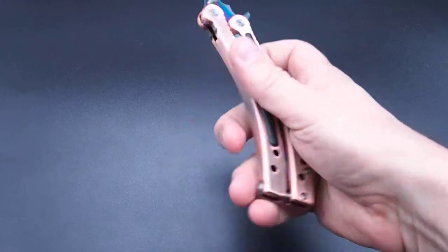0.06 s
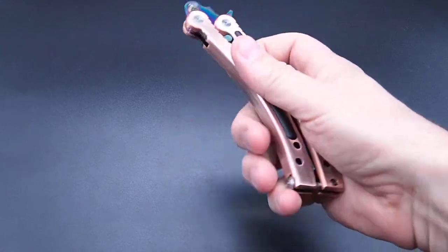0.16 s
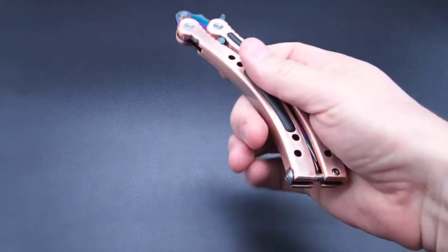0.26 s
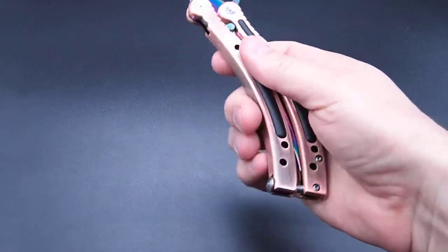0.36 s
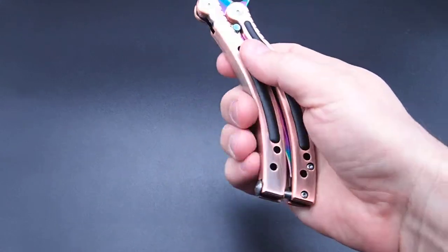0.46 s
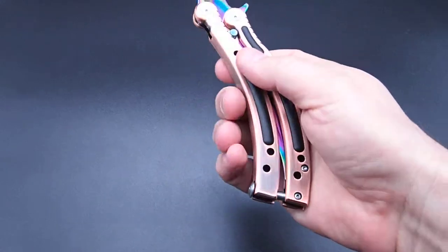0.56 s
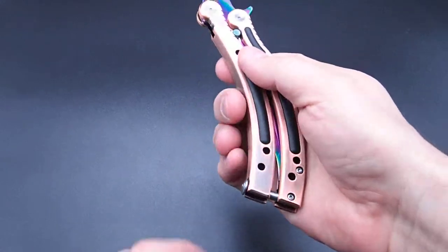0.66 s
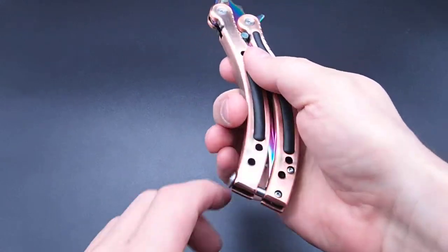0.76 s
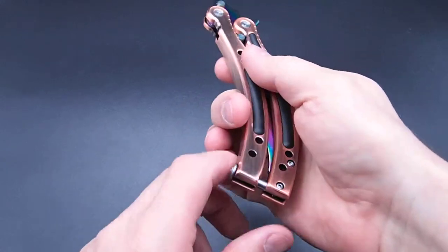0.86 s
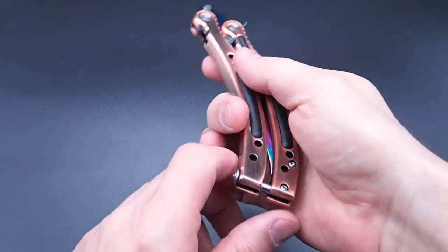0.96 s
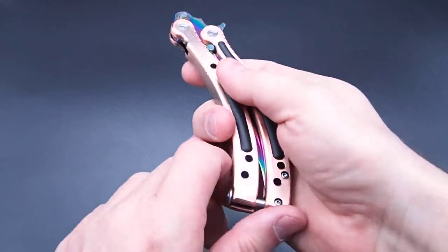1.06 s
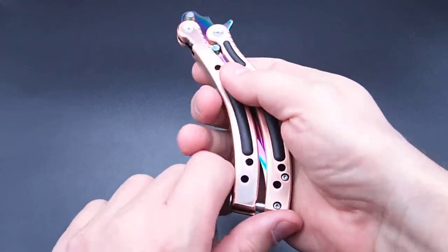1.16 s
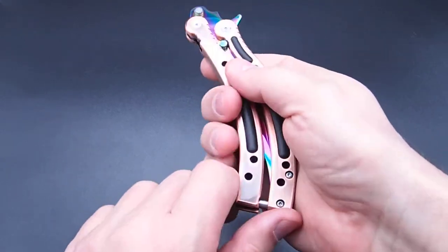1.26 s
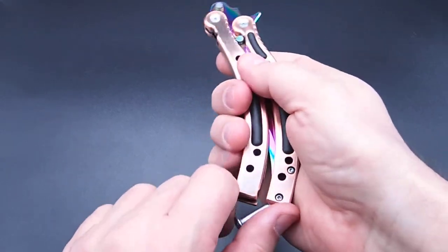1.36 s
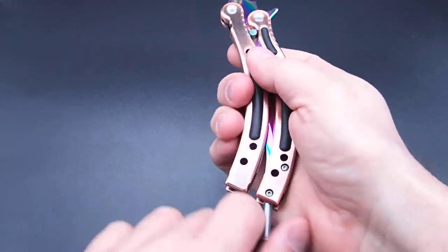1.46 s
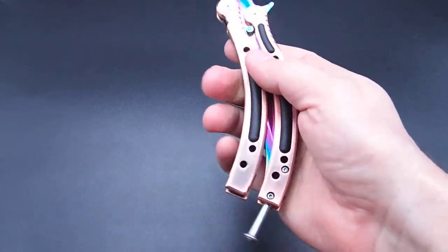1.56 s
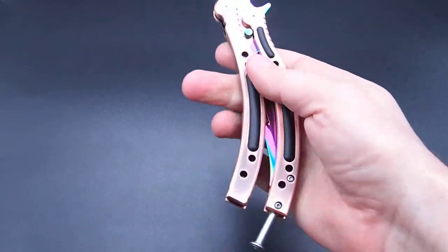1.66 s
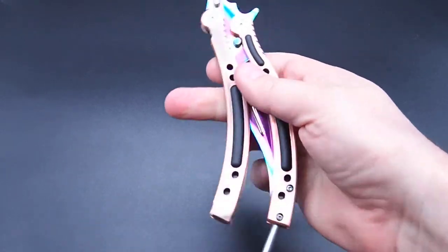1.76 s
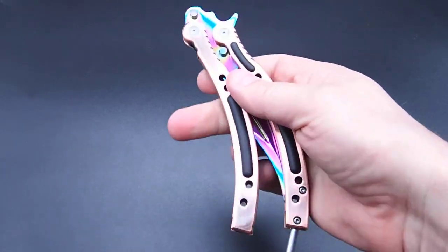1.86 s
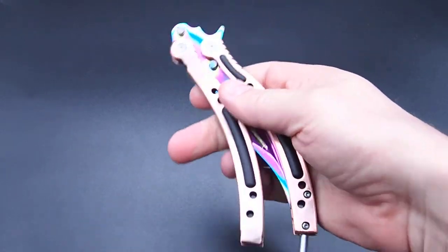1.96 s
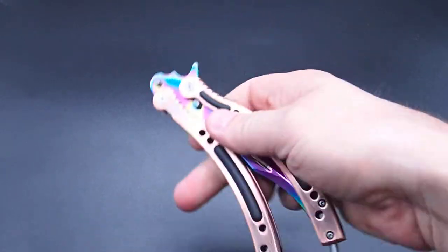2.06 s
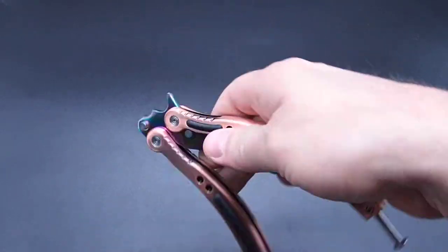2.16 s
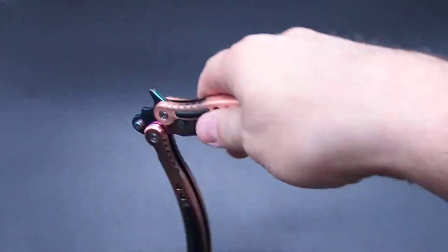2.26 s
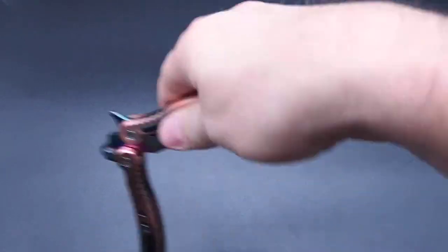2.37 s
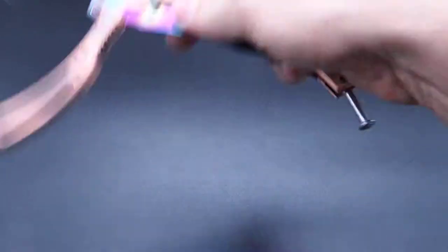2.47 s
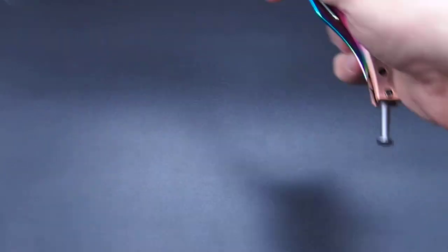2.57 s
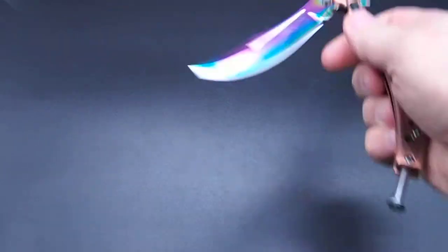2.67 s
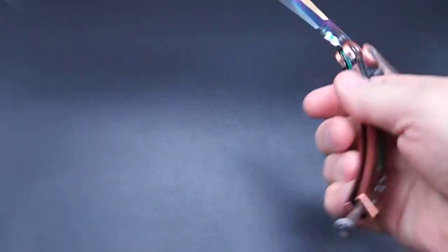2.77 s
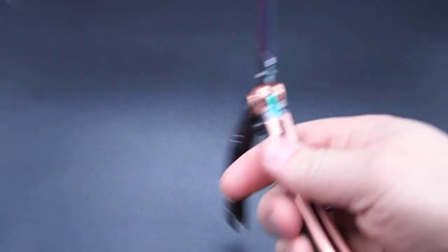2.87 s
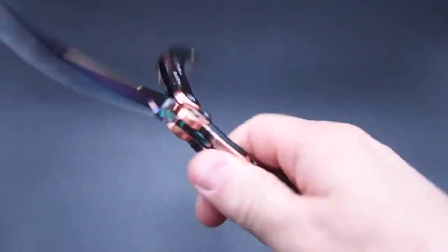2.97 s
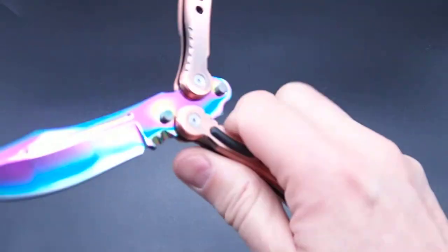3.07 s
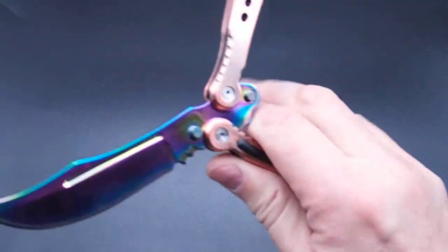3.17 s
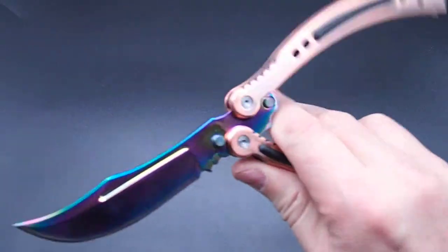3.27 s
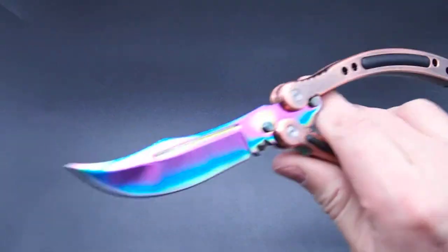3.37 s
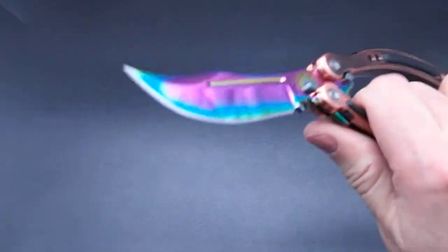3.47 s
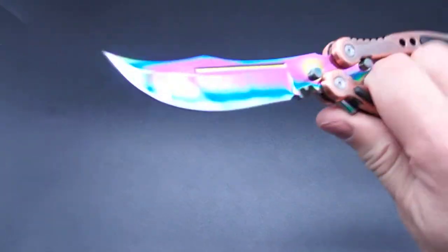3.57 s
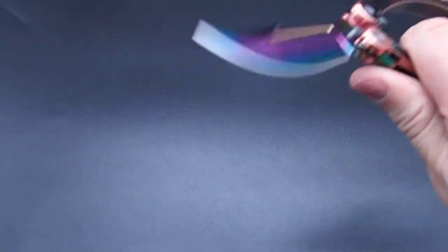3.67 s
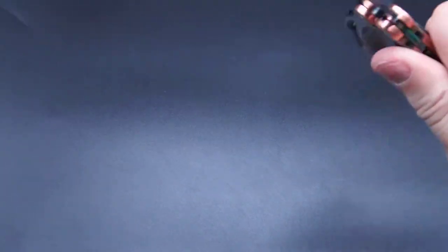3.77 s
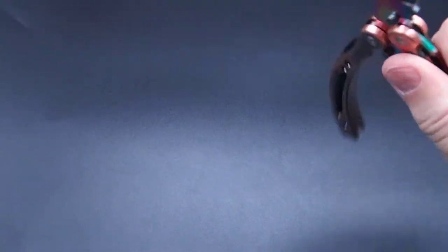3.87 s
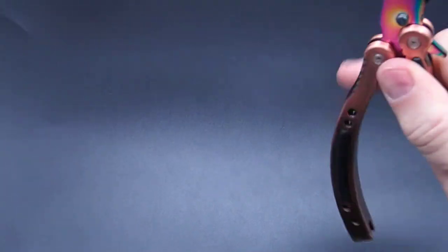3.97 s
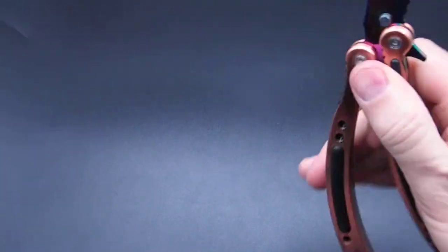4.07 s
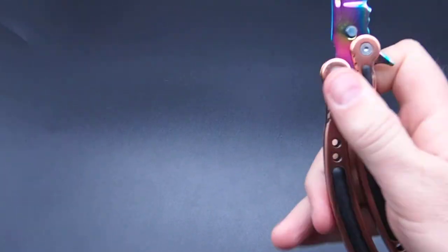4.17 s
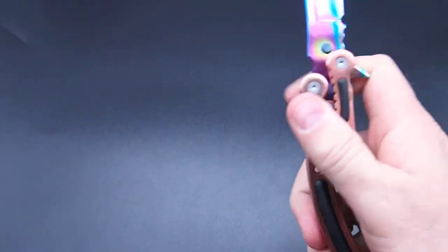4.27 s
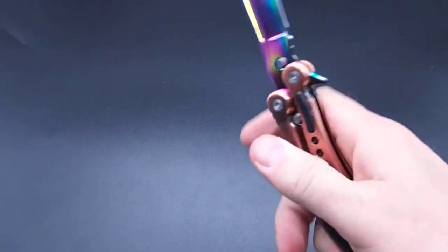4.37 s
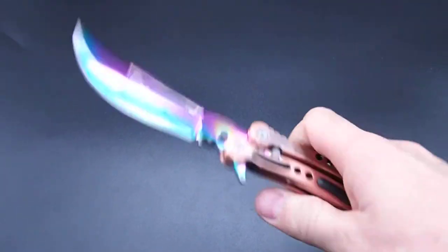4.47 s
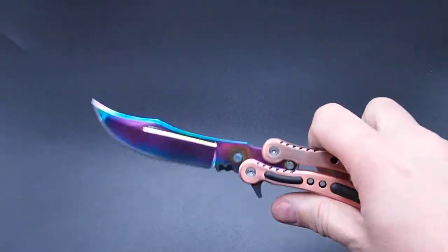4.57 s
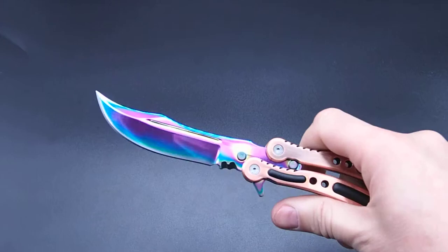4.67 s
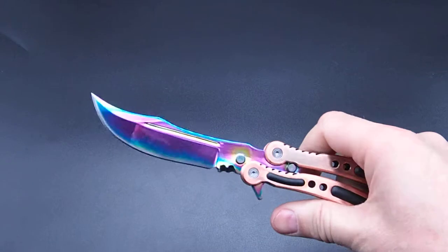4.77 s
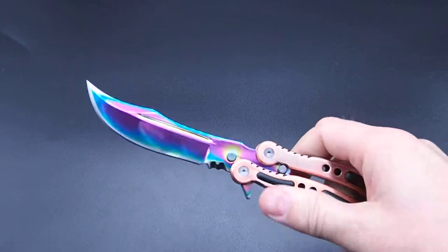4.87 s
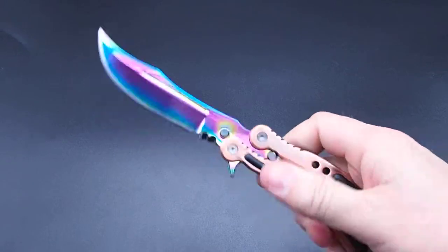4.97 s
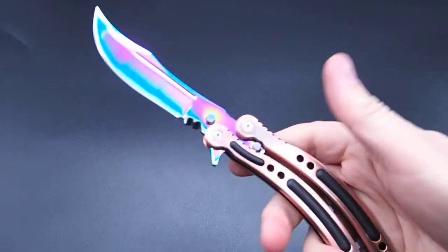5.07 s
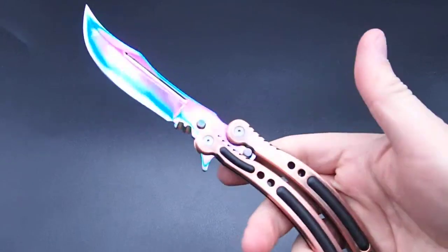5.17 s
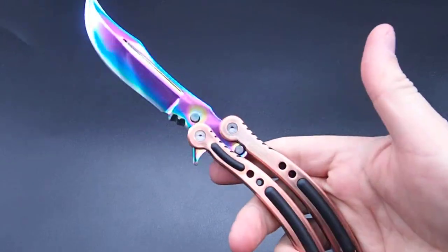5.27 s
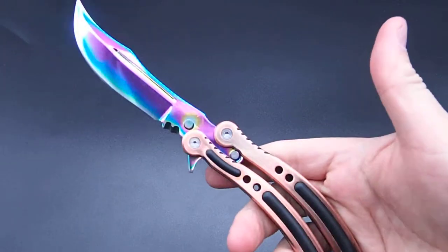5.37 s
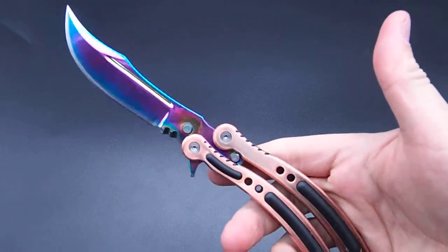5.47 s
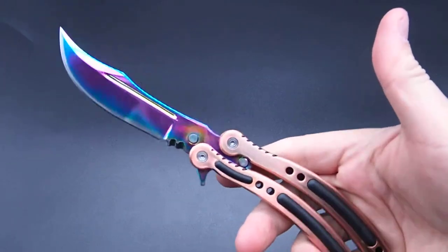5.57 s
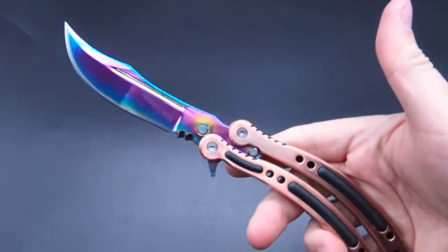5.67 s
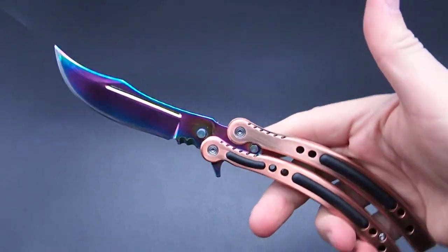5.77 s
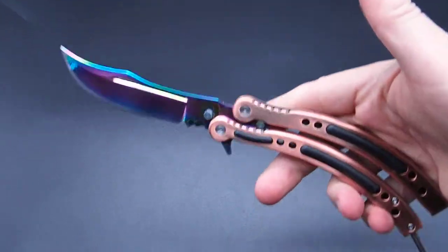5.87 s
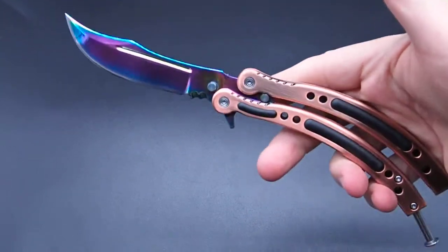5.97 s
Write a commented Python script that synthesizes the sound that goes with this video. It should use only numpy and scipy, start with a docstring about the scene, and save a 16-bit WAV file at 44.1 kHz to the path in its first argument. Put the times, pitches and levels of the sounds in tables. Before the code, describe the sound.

Close to the microphone in a small dry room, a metal butterfly knife is flipped open. After a quiet rustle of skin on steel come a latch click and small ticks, then a thump with a short scrape as a handle hits the desk. Several crisp, unevenly spaced metallic clacks follow, thinning out into gentle rubbing. A low hiss and a faint, intermittent high whine lie underneath.

```python
"""A steel butterfly knife is unlatched and flipped close to a microphone, above a desk in a small dry room.
Each impact of latch, handles and blade excites modes of the steel, which the hand damps.
Once a handle knocks on the desk, setting the top vibrating, and skids over it.
Friction of skin and pivots makes a soft rubbing between the clacks, over room hiss and a faint whine."""
import sys
import numpy as np
from scipy.fft import rfft, irfft, next_fast_len
from scipy.io import wavfile
from scipy.ndimage import uniform_filter1d, minimum_filter1d, map_coordinates

SR = 44100
rng = np.random.default_rng(int(sys.argv[2]) if len(sys.argv) > 2 else 0)


def persist_wave(psi):
    """Save psi, clipped to +-1, as 16-bit WAV."""
    counts = np.round(np.clip(psi, -1, 1) * 32767).astype(np.int16)
    wavfile.write(sys.argv[1], SR, np.atleast_2d(counts).T)


N = 265923

# noise spectra: f/Hz, relative spectral level/dB
HISS_SPECTRUM = [(25, -10.5), (60, -9.5), (140, -4), (450, -2.5), (1000, -5), (1600, -8.5), (2000, -16),
                 (3000, -19), (4100, -24), (4900, -11), (6800, -10), (8000, -7), (10000, -14), (16000, -15)]
RUB_SPECTRUM = [(1500, -21.5), (2800, -17.5), (4200, -19), (4800, -6.5), (5250, 2), (5900, -2), (6500, -8),
                (8000, -8), (10000, -20), (16000, -20.5)]
CLATTER_SPECTRUM = [(200, -59.5), (900, -29.5), (1800, -31.5), (2800, -19), (3400, -23), (4100, -22),
                    (4600, -10.5), (5150, 1), (6100, -6), (7100, -6.5), (9000, -12.5), (10300, -22),
                    (15000, -23.5), (16500, -26)]  # dense, unresolved modes of the steel
THUD_SPECTRUM = [(25, -12), (55, -2), (90, -5), (160, -3), (480, 5), (800, -2.5), (1600, -10), (2500, -32),
                 (8000, -80)]  # the dull push on the desk
DESK_CRACK_SPECTRUM = [(1500, -8), (4000, -8), (5000, 0), (15000, -4)]  # metal meeting the hard top
SKID_SPECTRUM = [(35, -53), (60, -7), (268, -16), (785, -12.5), (1010, -14.5), (1620, -7.5), (1860, -19),
                 (3580, -18), (4030, -21.5), (5210, -2), (10500, -25.5), (14200, -27), (16000, -45)]
# likeness of the two channels: f/Hz, left-right correlation
HISS_COHERENCE = [(60, 0.39), (180, 0.38), (550, 0.082), (1650, 0.086), (4970, -0.058), (15000, -0.052)]
DIRECT_COHERENCE = [(1400, 1), (6800, 0.69), (15000, 0.18)]
REFLECTED_COHERENCE = [(1400, 1), (6800, 0.4), (15000, .3)]
# strokes of sliding skin and turning pivots: t/s at greatest speed, duration/s, level/dB
STROKES = [(.068, .035, -52), (.56, .13, -51), (.70, .15, -44.7), (1.32, .02, -46), (1.445, .06, -48),
           (1.727, .03, -43), (2.05, .06, -54), (2.18, .055, -47), (2.585, .05, -46), (2.86, .16, -53),
           (3.08, .17, -50.5), (3.66, .09, -57), (4.1, .05, -55), (4.39, .07, -49.5), (4.55, .04, -54),
           (5.06, .05, -57), (5.87, .115, -46.5)]
# metal contacts: t/s, relative level/dB, clink f/Hz, clink level/dB,
# hollow note f/Hz, hollow note emphasis/dB, brightness/dB
CONTACTS = [(1.3328, -11.5, 5490, -2.5, 2190, 3.5, 3.5), (1.464, -29.5, 5200, 1, 2220, 7, 0),
            (1.557, -34, 5200, -3, 2980, -1, -6), (1.5632, -21, 5190, -3, 2990, -6, -4),
            (1.601, -35.5, 6100, -5, 2950, -1, -1), (2.268, -13, 5270, -11, 2104, 1, 3.5),
            (2.5963, -1, 5030, -1, 2940, 0, 1), (2.7716, -20.5, 4970, -8, 2200, 2, 0),
            (3.116, -33, 5140, -2, 2620, -2, -3.5), (3.3031, -.5, 5440, -4, 2700, -5, 3.5),
            (3.3222, -22, 5430, -2, 2700, -2, -5), (3.4663, -23.5, 6320, -5, 2700, -5, 5),
            (3.8545, -33.5, 5400, 0, 2800, 2, -1.5), (4.0362, -39, 4940, -8, 2750, 0, -3),
            (4.1310, -10, 5000, 2, 2560, 1, -.5), (4.1589, -8.5, 5130, -1, 2880, 3, .7),
            (4.459, -32.5, 5200, 3, 2760, -4, -4), (4.4718, -23, 5070, 7, 2800, 0, -6),
            (4.8015, -40, 5900, -11, 2940, 7, -1)]
# treble emphasis of a contact's first crack: f/Hz, gain/dB
CRACK_TREBLE = [(2000, 0), (5000, -5), (8000, 4), (12000, 8)]
# normal modes: f/Hz, relative level/dB, T60/s
STEEL_MODES = [(4682, -4, 0.036), (5370, -13, 0.096), (5270, -8, 0.047), (5510, -3.5, 0.036),
               (6140, -5.5, 0.055), (6920, -15, 0.071), (6540, -6.5, 0.028), (6940, -8, 0.066),
               (7500, -14.5, 0.067), (7470, -10, 0.046), (8870, -70, 0.025), (8720, -7, 0.024)]  # shared by all contacts
BLADE_MODES = [(1990, 0, .29)]
DESK_MODES = [(141, -7, 0.13), (170, -5, 0.066), (252, 0.5, .08), (386, -6, 0.066), (459, 3.5, 0.071),
              (690, -17, 0.056), (810, -2, 0.036), (932, -8, .06), (1179, -16, 0.099), (1620, -14, 0.078)]

WHINE_HZ, BLIPS_PER_S, BLIP_S = 6170, 3.5, .028
GRIP_DB, REST_DB, REST_S = -60, -65, 4.7  # rub of the working hand, of the resting hand; time of rest
RING_T60_S, CLINK_T60_S = .068, .05  # the hand damps the steel, and the struck part most
RISE_S, RISE_S_PER_DB = .00022, .00007  # attack of a full blow; weaker contacts close more slowly
KNOCK_S, SKID_S = 2.268, 2.3265


def amp(db):
    """Amplitude ratio of a level in decibels."""
    return 10 ** (np.asarray(db) / 20)


def unit(x):
    """Normalisation to rms 1."""
    return x / np.sqrt(np.mean(x ** 2) + 1e-20)


def along(points, hz):
    """Interpolation of (f/Hz, value) points on a logarithmic frequency axis."""
    f, value = np.transpose(points)
    return np.interp(np.log(hz + 1), np.log(f), value)


def wobble(rate):
    """Smooth random modulation: a spline through rate knots a second."""
    return map_coordinates(rng.standard_normal(int(N * rate / SR) + 4), [np.arange(N) * rate / SR])


def filtered(x, response):
    """Linear filtering: the spectrum of x times a frequency response."""
    n = x.shape[-1]
    padded = next_fast_len(n + 8192)
    return irfft(rfft(x, padded) * response(np.fft.rfftfreq(padded, 1 / SR)), padded)[..., :n]


def noise(spectrum, coherence, size):
    """Partly coherent stereo noise of rms 1: the ratio of mid to side sets the correlation."""
    def response(hz):
        angle = np.arccos(np.clip(along(coherence, hz), -1, 1)) / 2
        return amp(along(spectrum, hz)) * [np.cos(angle), np.sin(angle)]
    mid, side = filtered(rng.standard_normal((2, size)), response)
    return unit(np.array([mid + side, mid - side]))


def fade(t, t60):
    """Exponential decay of 60 dB in t60 seconds."""
    return np.exp(-np.log(1000) * t / t60)


def ring(modes, t, spread_rad, scatter_db=0):
    """Free vibration: a sum of damped modes, each reaching the two channels at its own phase."""
    hz, db, t60 = np.transpose(modes)[:, :, None]
    gain = amp(db + scatter_db * rng.standard_normal(hz.shape))
    phase = rng.uniform(0, 2 * np.pi, hz.shape) + spread_rad * rng.standard_normal((2, *hz.shape))
    waves = gain * fade(t, t60) * np.sin(2 * np.pi * hz * t + phase)
    return waves.sum(1) / np.sqrt(np.sum(gain ** 2) / 2)


def add(track, start_s, sound):
    """Superposition of a sound on the track from start_s."""
    part = track[:, round(start_s * SR):][:, :sound.shape[1]]
    part += sound[:, :part.shape[1]]


def room_hiss():
    """Stationary broadband noise, nearly incoherent between the channels in the treble."""
    return amp(-52) * noise(HISS_SPECTRUM, HISS_COHERENCE, N)


def whine():
    """A thin tone, unsteady through phase modulation and gated into brief blips at random times."""
    t = np.arange(N) / SR
    tone = np.sin(2 * np.pi * WHINE_HZ * t + .26 * wobble(150))
    blip_times = rng.uniform(0, N / SR, (round(BLIPS_PER_S * N / SR), 1))
    gate = np.exp(-(2 * (t - blip_times) / BLIP_S) ** 4).max(0, initial=0)
    return amp(-55.5) * gate * tone


def rubbing():
    """Sliding friction of skin and pivots: grainy noise whose strokes swell, ebb and add in power."""
    t = np.arange(N) / SR
    power = amp(np.interp(t, [REST_S - .5, REST_S + .5], [GRIP_DB, REST_DB])) ** 2
    for fastest_s, duration_s, db in STROKES:
        offset = np.minimum(2 * np.abs(t - fastest_s) / duration_s, 20)
        power += (amp(db) / np.cosh(offset)) ** 2
    grain = amp(.48 * wobble(35) + 1.1 * wobble(450))
    return np.sqrt(power) * unit(grain * noise(RUB_SPECTRUM, REFLECTED_COHERENCE, N))


def steel_impact(t, hollow_hz, hollow_db, bright_db):
    """Impact excitation: a crack, damped ringing and faint reverberation, coloured by the contact point."""
    burst = noise(CLATTER_SPECTRUM, DIRECT_COHERENCE, len(t))
    crack = amp(1.5) * fade(t, .011) * filtered(burst, lambda hz: amp(along(CRACK_TREBLE, hz)))
    clatter = amp(-4) * fade(t, RING_T60_S) * noise(CLATTER_SPECTRUM, DIRECT_COHERENCE, len(t))
    modes = amp(-3) * ring(STEEL_MODES, t, spread_rad=.25, scatter_db=4)
    room = amp(-28) * fade(t, .17) * noise(CLATTER_SPECTRUM, REFLECTED_COHERENCE, len(t))
    # where the parts meet shifts weight between low and high modes: f/Hz, gain/dB
    weighting = [(hollow_hz / 2, 1), (hollow_hz, hollow_db), (4400, 0), (5400, 0),
                 (6800, bright_db), (9000, bright_db), (11000, -4 + 1.3 * bright_db)]
    return filtered(crack + clatter + modes + room, lambda hz: amp(along(weighting, hz)))


def blade_bending(t, blow_db):
    """Flexural vibration of the blade, growing more than in proportion to the blow."""
    return amp(-51.5 + 1.6 * blow_db) * ring(BLADE_MODES, t, spread_rad=.1)


def clacks():
    """Modal superposition: to the shared ringing each struck part adds a clink and a hollow bending note."""
    out, t = np.zeros((2, N)), np.arange(SR // 3) / SR
    for start_s, db, clink_hz, clink_db, hollow_hz, hollow_db, bright_db in CONTACTS:
        steel = steel_impact(t, hollow_hz, hollow_db, bright_db)
        clink = amp(clink_db) * ring([(clink_hz, 0, CLINK_T60_S)], t, spread_rad=.31)
        hollow = amp(hollow_db - 27) * ring([(hollow_hz, 0, RING_T60_S)], t, spread_rad=.2)
        rise_s = RISE_S + RISE_S_PER_DB * max(-db, 0)
        hit = (steel + clink + hollow) * (1 - np.exp(-t / rise_s))
        add(out, start_s, amp(db - 21.5) * unit(hit) + blade_bending(t, db))
    return out


def desk_knock():
    """A swinging handle excites the plate modes of the desk top, with a dull thud and a contact crack."""
    out, t = np.zeros((2, N)), np.arange(SR // 3) / SR
    boom = ring(DESK_MODES, t, spread_rad=.11, scatter_db=1.5)
    thud = amp(-4.5) * fade(t, .084) * noise(THUD_SPECTRUM, DIRECT_COHERENCE, len(t))
    crack = fade(t, .014) * noise(DESK_CRACK_SPECTRUM, DIRECT_COHERENCE, len(t))
    attack = 1 - np.exp(-t / .0039)
    add(out, KNOCK_S, amp(-19) * ((boom + thud) * attack + crack))
    return out


def desk_skid(attack_s=.002, hold_s=.02, t60_s=.06):
    """Intermittent friction: the rebounding handle lands again and chatters across the desk."""
    out, t = np.zeros((2, N)), np.arange(SR // 3) / SR
    grain = amp(1.1 * wobble(400)[:len(t)])
    chatter = unit(grain * noise(SKID_SPECTRUM, DIRECT_COHERENCE, len(t)))
    contact = np.minimum(t / attack_s, 1) * fade(np.maximum(t - hold_s, 0), t60_s)
    add(out, SKID_S, amp(-32) * contact * chatter)
    return out


def scene():
    """A level difference between the channels places knife and background a little to the left."""
    knife = clacks() + desk_knock() + desk_skid() + rubbing()
    background = room_hiss() + whine()
    return knife * amp([[1.2], [-1.2]]) + background * amp([[1.0], [-1.0]])


def limiter(x, ceiling_db, recovery_db_per_s):
    """Peak limiting: the gain falls for peaks above the ceiling and recovers at a constant rate."""
    excess_db = np.maximum(20 * np.log10(np.abs(x).max(0) + 1e-9) - ceiling_db, 0)
    ramp_db = recovery_db_per_s * np.arange(N) / SR
    gain_db = ramp_db - np.maximum.accumulate(excess_db + ramp_db)
    held_db = minimum_filter1d(gain_db, size=45)
    return x * amp(uniform_filter1d(held_db, size=45))


def record(dry):
    """Peak limiting, then band limiting by a second-order low cut and a steep treble cutoff."""
    def passband(hz, low_hz=36, top_hz=15950):
        return hz ** 2 / np.hypot(hz ** 2, low_hz ** 2) / (1 + (hz / top_hz) ** 140)
    return filtered(limiter(dry, ceiling_db=-1.2, recovery_db_per_s=68), passband)


dry = scene()
out = record(dry)
persist_wave(out)
```